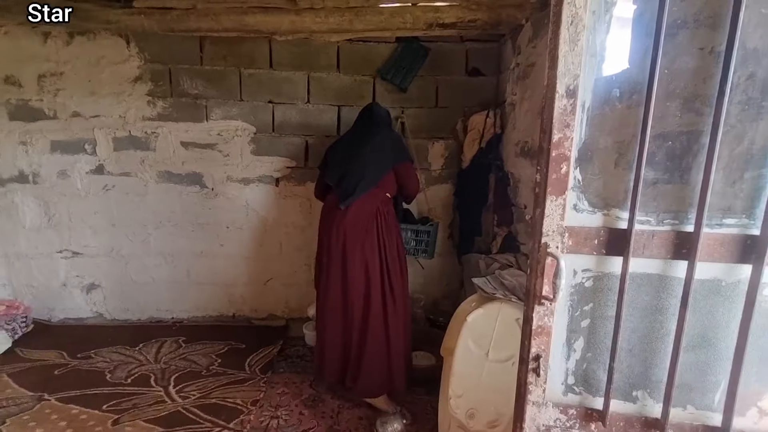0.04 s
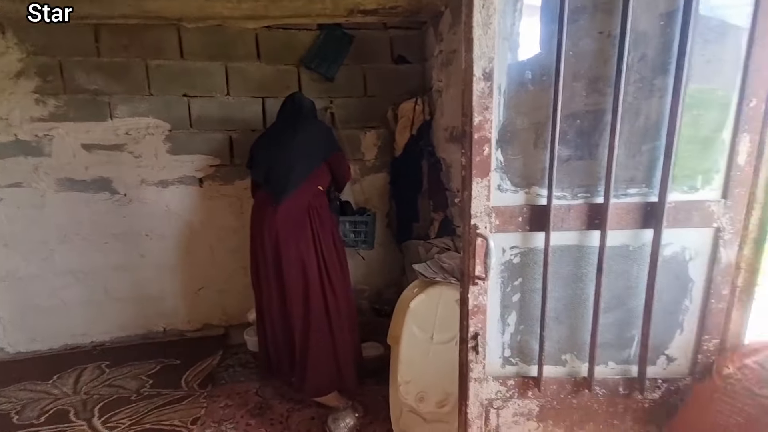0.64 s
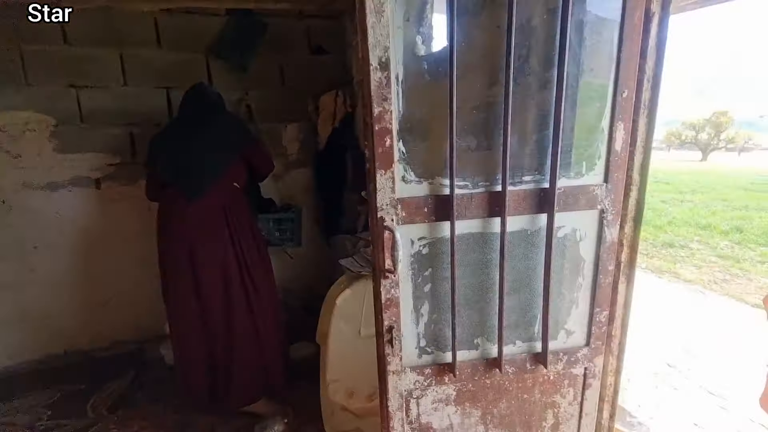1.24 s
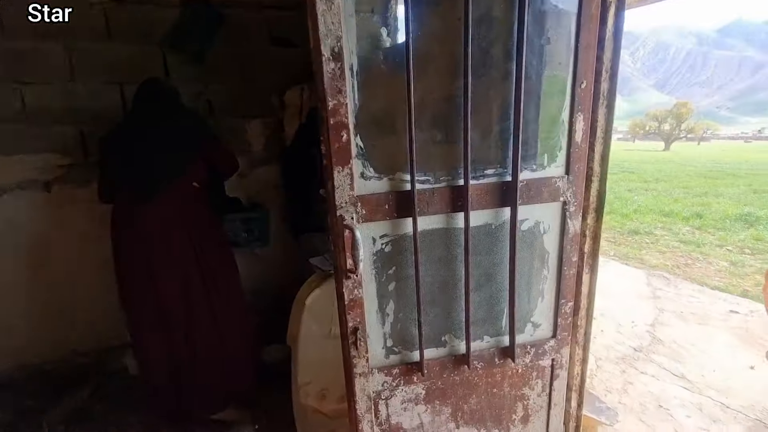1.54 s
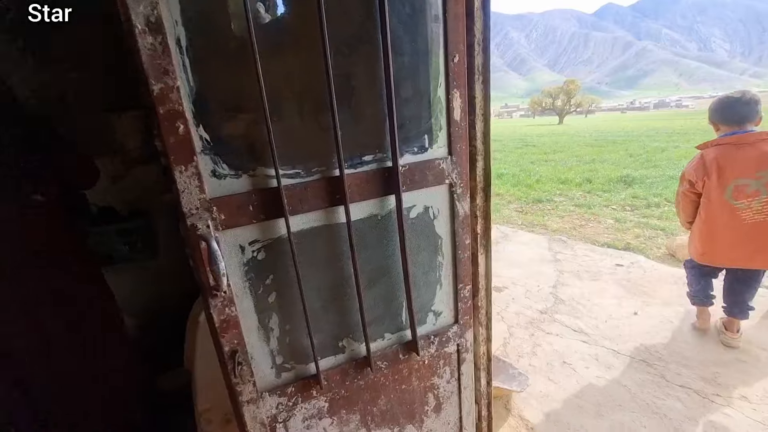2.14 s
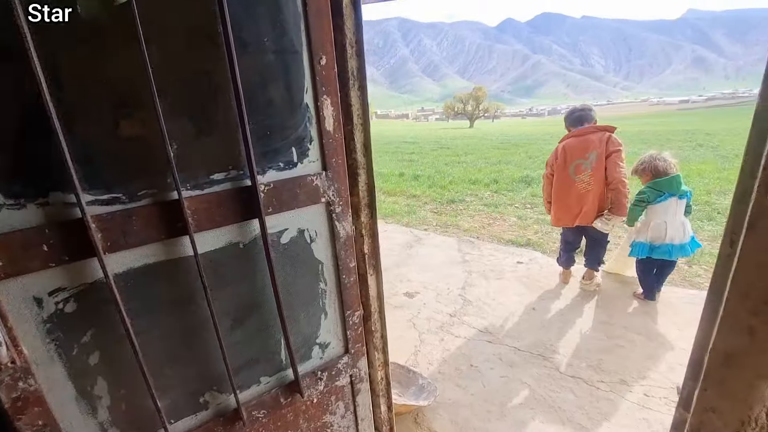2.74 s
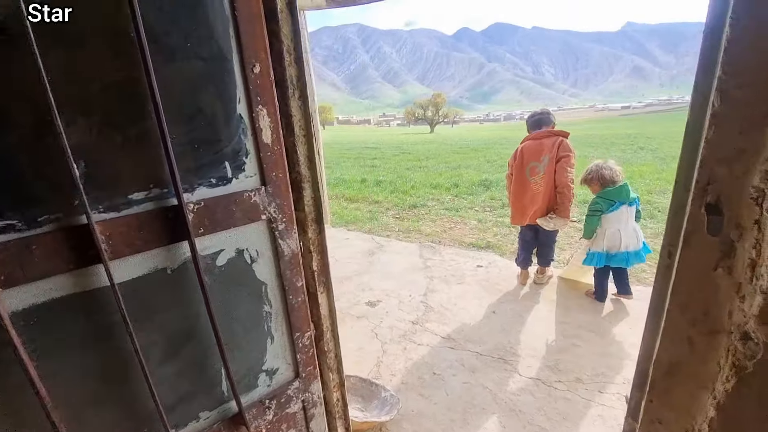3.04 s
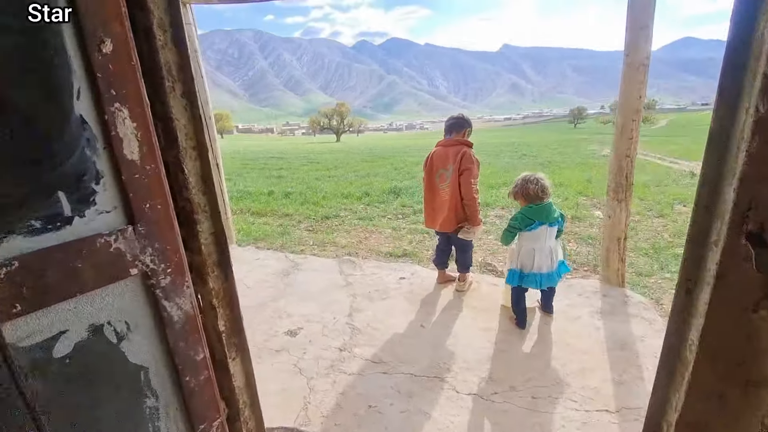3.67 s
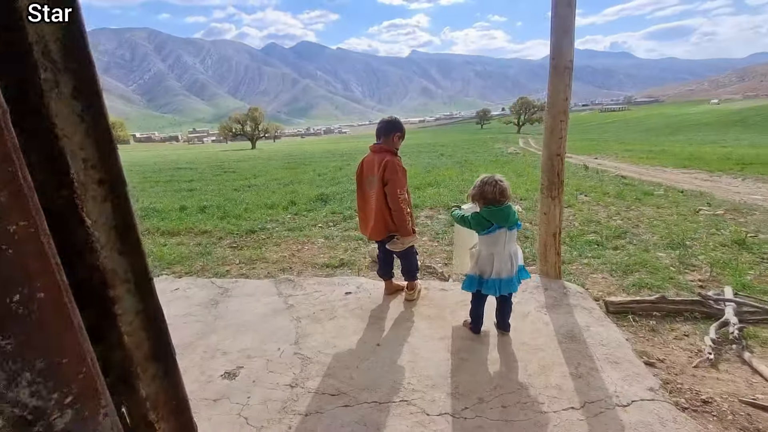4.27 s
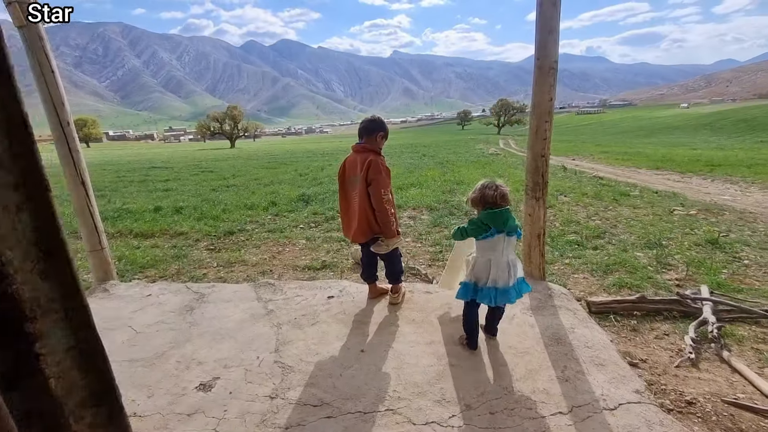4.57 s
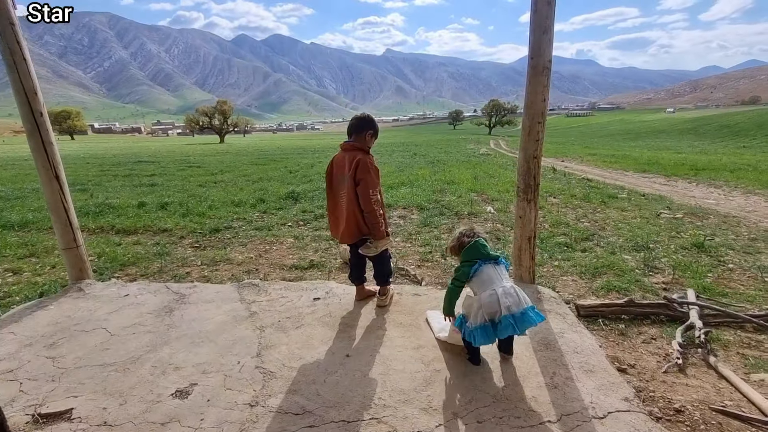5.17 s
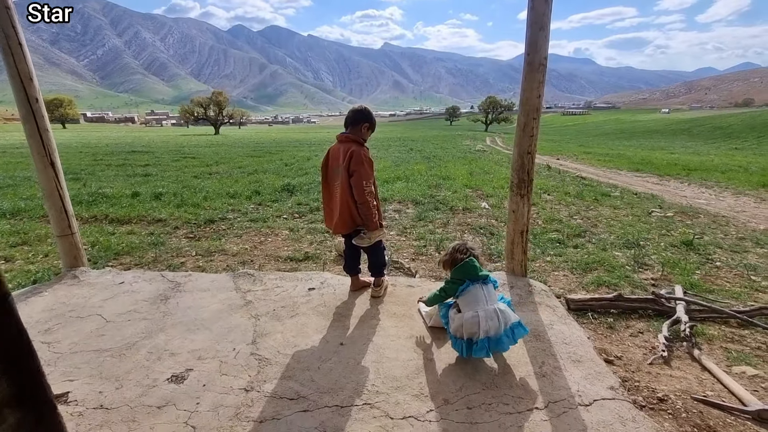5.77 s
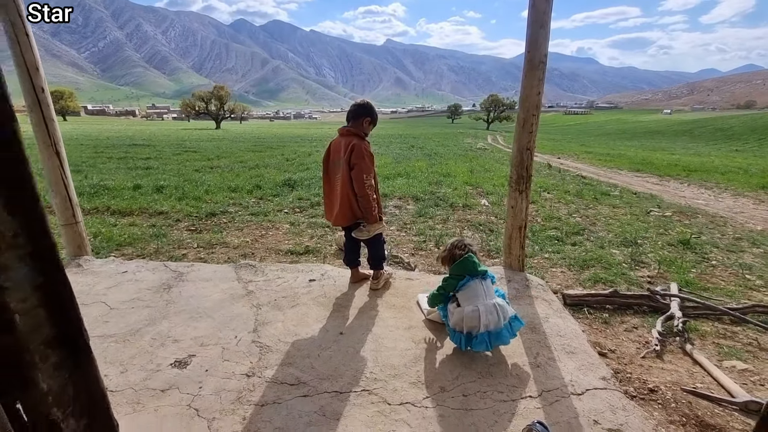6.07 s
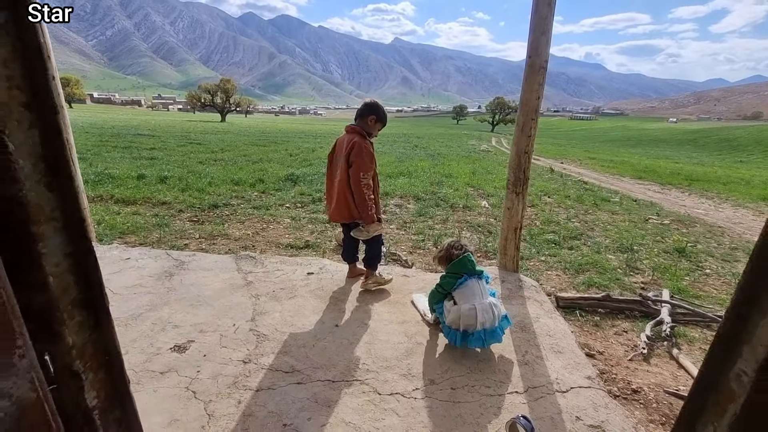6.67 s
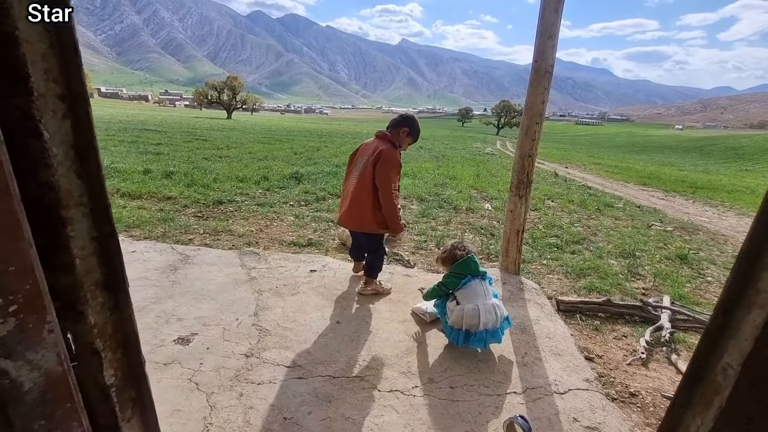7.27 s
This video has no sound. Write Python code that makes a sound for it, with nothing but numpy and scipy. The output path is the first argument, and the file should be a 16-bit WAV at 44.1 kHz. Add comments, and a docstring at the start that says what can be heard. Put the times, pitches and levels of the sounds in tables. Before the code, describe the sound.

A sharp clack of kitchenware opens, then come light hollow knocks and a dull thud on wood. For a few seconds there is only soft cloth rubbing and low rumble from the hand carrying the phone. A faint rising squeak leads into a quick cluster of ringing clinks from two glasses, with another thud beneath. The room is small with little echo, and the close sleeve rustle continues to the end.

```python
"""Kitchen clatter from a doorway

A hand-held phone is carried into a small, dead room, its two microphone ports hearing the grip
rumble and a sleeve rub right beside them. Out in the room, kitchen things are put down with a hard
clack, lighter knocks and wooden thuds, while dull bumps come through the phone's own case.
Near 5 s something squeaks faintly, then two glasses clink and chatter against each other."""
import sys
import numpy as np
from scipy import signal
from scipy.fft import rfft, irfft
from scipy.io import wavfile
from scipy.ndimage import uniform_filter1d, map_coordinates

SR = 44100
rng = np.random.default_rng(int(sys.argv[2]) if len(sys.argv) > 2 else 0)


def store_pcm(level_fs):
    """Save levels as 16-bit WAV."""
    pcm = np.round(np.clip(level_fs, -1, 1) * 32767).astype(np.int16)
    wavfile.write(sys.argv[1], SR, np.atleast_2d(pcm).T)


N = 331632
TIME = np.arange(N) / SR
AGE = TIME[:SR * 3 // 4]  # seconds since the start of a short sound
SIDES = np.array([[1], [-1]])  # left port, right port


def undb(db):
    """Decibels to gain."""
    return 10 ** (np.asarray(db) / 20)


def along(points, hz):
    """Read (f/Hz, value) points on a log-frequency axis."""
    at, value = np.transpose(points)
    return np.interp(np.log(np.maximum(hz, 1)), np.log(at), value)


def bins(size):
    """Frequencies of a spectrum of this many samples."""
    return np.maximum(np.fft.rfftfreq(size, 1 / SR), 1)


def unit(x):
    """Scale so that the mean of both channels has rms 1."""
    return x / np.std(x.mean(axis=0))


def add(out, s, sound):
    """Mix a sound in at time s."""
    start = int(s * SR)
    out[:, start:start + sound.shape[1]] += sound[:, :N - start]


def walk(rate):
    """Random levels held 1 / rate s and smoothed twice."""
    step = int(SR / rate)
    held = np.repeat(rng.standard_normal(N // step + 1), step)[:N]
    return uniform_filter1d(uniform_filter1d(held, step), step)


def movement(start, rise, hold, fade):
    """Power of one movement: it gathers speed smoothly, holds, then falls 20 dB per fade time."""
    age = TIME - start
    attack = np.sin(np.pi / 2 * np.clip(age / rise, 0, 1)) ** 2
    release = undb(-20 * np.maximum(age - rise - hold, 0) / fade)
    return (attack * release) ** 2


# how alike the phone's two ports hear the room: f/Hz, correlation
PORT_LIKENESS = [(60, 0.9), (150, 0.94), (650, 0.47), (1400, -0.33), (3000, 0.05), (15000, 0)]

def noise(colour, size, grain_db=0):
    """Spectrum of diffuse noise at the two ports; uneven grain sizes make it scratchy."""
    hz = bins(size)
    mid, side = rfft(rng.standard_normal((2, size)) * undb(grain_db * rng.uniform(-0.99, 1, size)))
    alike = along(PORT_LIKENESS, hz)
    return (mid * np.sqrt(1 + alike) + SIDES * side * np.sqrt(1 - alike)) * undb(along(colour, hz))


def dense_ring(colour, decay, tilt_db=0):
    """A blow and its early reflections: octave bands of noise, each dying at its own rate."""
    size = len(AGE)
    hz = bins(size)
    spectrum = noise(colour, size) * undb(tilt_db * np.log2(np.maximum(hz / 1000, 1)))
    centres = 2. ** np.arange(5, 15)
    bands = np.array([irfft(spectrum * np.maximum(1 - abs(np.log2(hz / c)), 0), size) for c in centres])
    fade = undb(-60 * AGE / along(decay, centres)[:, None])
    return (bands * fade[:, None]).sum(axis=0) / np.std(bands.sum(axis=0))


def ring(modes, tilt_db=0):
    """Decaying modes; the higher ones reach the two ports out of step."""
    out = 0
    for hz, db, t60 in modes:
        apart = np.arccos(along(PORT_LIKENESS, hz)) * rng.choice([-1, 1])
        phase = rng.uniform(0, 2 * np.pi) + SIDES * apart / 2
        fade = undb(db + tilt_db * np.log2(max(hz / 1000, 1)) - 60 * AGE / t60)
        out = out + fade * np.sin(2 * np.pi * hz * AGE + phase)
    return out


def blows(events, modes, colour, decay, modes_db):
    """An object is struck; softer contact dulls both its modes and its dense ring above 1 kHz."""
    out = np.zeros((2, N))
    for s, db, tilt_db, build, pan_db in events:
        sound = dense_ring(colour, decay, tilt_db) + undb(modes_db) * ring(modes, tilt_db)
        onset = 1 - np.exp(-AGE / build)
        add(out, s, sound * onset * undb(db + SIDES * pan_db / 2))
    return out


# spectrum of the handling noise: f/Hz, level/dB
GRIP_SPECTRUM = [(20, -25), (40, -3.5), (62, -1), (85, -5.5), (130, -15.5), (600, -41.5)]
# fingers shifting on the phone: t/s, hold/s, level/dB
GRIP_SHIFTS = [(0.364, 0.68, -64), (2.403, .1, -57), (3.62, 0.37, -61.5), (5.647, 0.16, -53),
               (6.385, 0.03, -57), (7.376, 0.089, -60)]
# dull bumps on the case itself: t/s, level/dB, f/Hz, t60/s
CASE_BUMPS = [(0.0993, -12, 215, 0.0046), (0.944, -35.5, 129, 0.09), (0.977, -38, 77, 0.16),
              (1.484, -46, 218, 0.11), (1.495, -38.5, 93.7, 0.14), (1.538, -33.5, 76, 0.12),
              (2.419, -41, 66.2, 0.37), (3.736, -46, 61, 0.28), (5.284, -35.5, 244, 0.29),
              (5.303, -38, 76, 0.31), (5.748, -49, 107, .15)]

def hand(grip_db=-59, settle_db_per_s=1.1, sway_db=4.0):
    """The grip rumbles through the case as it settles, swells when fingers shift, and bumps it."""
    power = undb(grip_db - settle_db_per_s * TIME) ** 2
    for start, hold, db in GRIP_SHIFTS:
        power += movement(start, rise=0.035, hold=hold, fade=0.4) * undb(db) ** 2
    rumble = unit(irfft(noise(GRIP_SPECTRUM, N), N))
    out = rumble * np.sqrt(power) * undb(sway_db * walk(8.8))
    for s, db, hz, t60 in CASE_BUMPS:
        fade = undb(db - 60 * AGE / t60)
        add(out, s, -(fade * np.sin(2 * np.pi * hz * AGE))[None])
    return out


# spectrum of cloth rubbing at the microphone: f/Hz, level/dB
CLOTH_SPECTRUM = [(90, -31.5), (160, -15), (310, -11.5), (440, -6.5), (1450, -5.5), (2350, -3.5),
                  (3100, -4.5), (4200, -3), (5800, -9.5), (7400, -9.5), (8900, -17.5), (12700, -11),
                  (16000, -16.5)]
# slides beside the ports: t/s, rise/s, hold/s, fade/s, hiss/dB, scrape re hiss/dB, air re hiss/dB
SLEEVE_SLIDES = [(0.054, .1, 0.56, 0.34, -65, 0.5, -14), (0.23, 0.036, .01, 0.11, -56.5, 2, -6.5),
                 (0.467, 0.22, 0.53, .3, -52.5, -6.5, -8.5), (0.868, 0.08, 0.071, 0.35, -46.5, -10, -6.5),
                 (1.03, .1, .025, 0.12, -48.5, -7.5, -14.5), (1.205, 0.066, 0.26, 0.32, -57, -10.5, -8),
                 (1.71, 0.078, 0.011, 0.14, -62.5, -22, -6), (1.852, 0.058, 0.33, 0.31, -61.5, -7.5, -9.5),
                 (2.06, 0.094, 0.0078, 0.14, -50, -18, -8), (2.183, 0.22, 0.27, 0.84, -49.5, -9, -10),
                 (2.833, 0.061, 0.021, 0.28, -53.5, -6, -10), (3.01, .14, 0.042, 0.28, -52, -7.5, -7.5),
                 (3.255, 0.09, 0.28, 1, -51.5, -7.5, -13.5), (4.4, 0.054, 0.0069, 0.038, -54, -12, -6.5),
                 (4.65, 0.086, .02, 0.57, -66.5, -3.5, -23), (4.826, .12, 0.05, 0.061, -62, -8.5, -12),
                 (5.5, 0.083, 0.1, 0.23, -59.5, 1, -15), (5.649, 0.057, .02, 0.19, -50, -5, -6.5),
                 (5.738, 0.092, 0.042, 0.44, -46, -11.5, -7.5),
                 (6.25, 0.065, 0.025, 0.19, -47, -6.5, -11.5),
                 (6.37, 0.075, 0.15, 0.42, -55.5, -7.5, -12.5), (6.996, 0.11, 0.062, 0.7, -54, -13, -12),
                 (7.28, 0.082, 0.032, 0.31, -55.5, -10.5, -13)]

def sleeve(scrape_hz=1900, air_hz=8200, flutter_db=1.51, sway_db=0.1):
    """Countless fibres slip right beside the ports: a low scrape, a hiss and an airy top."""
    hiss, scrape, air = undb([-73.5, -79, -81]) ** 2  # the cloth never rests entirely
    for start, rise, hold, fade, db, scrape_db, air_db in SLEEVE_SLIDES:
        power = movement(start, rise, hold, fade) * undb(db) ** 2
        hiss = hiss + power
        scrape = scrape + power * undb(scrape_db) ** 2
        air = air + power * undb(air_db) ** 2
    hz = bins(N)
    fibres = noise(CLOTH_SPECTRUM, N, grain_db=7.5)
    low = 1 / (1 + (hz / scrape_hz) ** 4)
    high = 1 - 1 / (1 + (hz / air_hz) ** 10)
    layers = [(low, scrape), (1 - low - high, hiss), (high, air)]
    rubbing = sum(unit(irfft(fibres * band, N)) * np.sqrt(power) for band, power in layers)
    return rubbing * undb(flutter_db * walk(90) + sway_db * walk(25))  # the cloth catches and lets go


# hard contacts in the room: t/s, level/dB, treble tilt/(dB/octave), build-up/s, left minus right/dB
CLACK_HITS = [(0.0338, -15, -1, 0.0005, 1.5), (0.0378, -17, -3, 0.0011, -2.5),
              (0.0455, -21.5, 0, 0.0015, 4), (0.064, -29, -6, .003, -0.5)]
# modes of the hard object: f/Hz, level/dB, t60/s
CLACK_MODES = [(835, -7, .16), (912, -3, .18), (983, -2, .18), (1186, -7, .18), (1295, -5, .24),
               (1415, -2, .17), (1772, 4, .15), (2010, -4, .17), (2907, -3, .19), (3050, -4, .17),
               (3290, -3, .13), (3623, 1, .13), (4124, -6, .14)]
# spectrum of its dense ring: f/Hz, level/dB
CLACK_SPECTRUM = [(100, -26.5), (420, -15.5), (850, -2), (1800, -1), (2500, -4.5), (3400, -6.5), (4500, -6),
                  (5600, -8), (7600, -11), (9000, -21), (15000, -35.5)]
# decay of its dense ring: f/Hz, t60/s
CLACK_T60 = [(200, 0.32), (1000, 0.15), (3000, 0.2), (8000, 0.071), (15000, 0.25)]

def clack():
    """A hard kitchen thing is put down: four contacts in quick succession set it ringing."""
    return blows(CLACK_HITS, CLACK_MODES, CLACK_SPECTRUM, CLACK_T60, modes_db=-6)


# sleeve folds catching on the phone: t/s, length/s, level/dB, centre/Hz, width/Hz
FOLD_STROKES = [(0.165, 0.078, -52, 5640, 8000), (1.271, 0.026, -47.5, 4090, 1478),
                (1.341, 0.08, -51, 3860, 1006), (1.882, 0.045, -55, 6600, 12200),
                (2.369, .6, -55.5, 2380, 700), (3.424, 0.45, -53, 2550, 700),
                (5.067, 0.069, -60, 4780, 2500), (5.671, 0.12, -42.5, 3960, 497),
                (5.86, 0.48, -59, 4100, 600), (6.288, 0.11, -51, 2850, 1448),
                (6.913, .058, -61.5, 4100, 800), (7.217, 0.09, -54, 3400, 1500)]

def folds(rasp_db=3):
    """A fold drags over the case: uneven slips ring one resonance, swelling quickly and fading."""
    out, size = np.zeros((2, N)), len(AGE)
    hz = bins(size)
    for s, length, db, centre, width in FOLD_STROKES:
        resonance = 1 / (1 + 1j * (hz / centre - centre / hz) * centre / width)
        rasp = unit(irfft(noise(CLOTH_SPECTRUM, size) * resonance, size))
        swell = np.interp(AGE / length, [0, 1 / 5, 1 / 2, 1], [0, 1, 3 / 4, 0])
        add(out, s, undb(db) * swell * rasp)
    return out * undb(rasp_db * walk(120))


# light knocks in the room: t/s, level/dB, treble tilt/(dB/octave), build-up/s, left minus right/dB
HOLLOW_HITS = [(0.173, -46, -20, 0.00063, 1), (0.641, -35, 0.5, 0.00094, -0.5), (.652, -47.5, 6, 0.0012, 2),
               (0.667, -45, 10, 0.001, -2), (0.773, -38, 7.5, 0.0035, -3), (1.0225, -35.5, 2, 0.0009, -0.5)]
# modes of the knocked object: f/Hz, level/dB, t60/s
HOLLOW_MODES = [(904, 11.5, 0.029), (774, -1.5, 0.081), (862, -1, 0.16), (1216, 0, 0.076),
                (1743, -3.5, 0.1)]
# spectrum of its dense ring: f/Hz, level/dB
HOLLOW_SPECTRUM = [(100, -42), (260, -3.5), (550, -10.5), (800, -2), (1400, -2.5), (1750, -5), (2600, -15),
                   (12000, -59)]
# decay of its dense ring: f/Hz, t60/s
HOLLOW_T60 = [(300, 0.31), (3000, 0.11)]

def hollow_knocks():
    """Things set down more lightly answer with a short, hollow midrange ring."""
    return blows(HOLLOW_HITS, HOLLOW_MODES, HOLLOW_SPECTRUM, HOLLOW_T60, modes_db=0.5)


# thuds in the room: t/s, level/dB, treble tilt/(dB/octave), build-up/s, left minus right/dB
WOOD_HITS = [(1.9522, -31, -1, 0.00029, 0.5), (1.958, -36.5, -9, 0.00099, -3),
             (0.931, -42, -17, 0.0031, -2), (5.286, -34.5, -5, 0.0075, -1.5),
             (5.314, -37.5, -16, 0.014, -1), (5.5755, -53, 1, 0.0006, -6)]
# modes of the wood: f/Hz, level/dB, t60/s
WOOD_MODES = [(268, 2, 0.14), (325, 3, 0.12), (436, 1, .12), (485, 3, 0.12), (665, -4, 0.11),
              (855, -4, 0.12)]
# spectrum of its dense ring: f/Hz, level/dB
WOOD_SPECTRUM = [(50, 3.5), (140, -5.5), (380, -6), (750, -8.5), (1250, -14), (2000, -7.5), (3100, -6),
                 (4800, -18.5), (12000, -36)]
# decay of its dense ring: f/Hz, t60/s
WOOD_T60 = [(100, 0.12), (500, 0.2), (3000, 0.11), (12000, 0.083)]

def wooden_thuds():
    """Struck wood sounds its low, quickly damped modes."""
    return blows(WOOD_HITS, WOOD_MODES, WOOD_SPECTRUM, WOOD_T60, modes_db=-4)


# course of a squeak, faint at the microphone: t/s, f/Hz, level/dB
SQUEAK_GLIDE = [(4.932, 520, -66), (4.965, 883, -58), (4.99, 940, -54), (5.015, 1020, -68)]

def squeak(roughness=0.053, overtone_db=-13, flutter_db=3):
    """A short, unsteady tone glides upward."""
    s, hz, db = np.transpose(SQUEAK_GLIDE)
    pitch = np.interp(TIME, s, hz) * (1 + roughness * walk(600))
    phase = 2 * np.pi * np.cumsum(pitch) / SR + SIDES / 2
    loudness = np.interp(TIME, s, undb(db), left=0, right=0) * undb(flutter_db * walk(200))
    return (np.sin(phase) + undb(overtone_db) * np.sin(2 * phase)) * loudness


# modes of each glass: f/Hz, level/dB, t60/s
FIRST_GLASS = [(2940, -3.5, 0.31), (3100, -5, 0.25), (5238, -12.5, 0.21), (6950, -13, 0.2),
               (7270, -3, 0.13), (7960, -11, .14), (10200, -24, 0.13), (13750, -25, .2)]
SECOND_GLASS = [(2920, -1, 0.23), (2960, -3.5, 0.27), (3056, -2.5, 0.26), (5120, -18.5, 0.34),
                (5150, -19, 0.5), (6100, -19.5, 0.028), (7060, -13.5, 0.24), (7205, -10, 0.2),
                (7800, -13.5, 0.2), (10166, -33, 0.24), (10800, -32, 0.3), (13404, -22, 0.18),
                (13950, -30, .17)]
# glass meeting glass in the room: t/s, first glass/dB, second glass/dB, snap/dB
GLASS_CONTACTS = [(5.222, -45, -63, -39.5), (5.231, -30, -60, -38.5), (5.246, -25, -63, -34),
                  (5.315, -37, -28.5, -29), (5.3205, -48, -24.5, -24), (5.3244, -37, -15.5, -32),
                  (5.427, -38, -35, -35.5), (5.487, -46, -33, -45), (5.516, -45, -34.5, -45)]
# spectrum of the clink's snap, with a deep notch near 8.8 kHz from audio coding: f/Hz, level/dB
NOTCHED_SNAP_SPECTRUM = [(250, -8.5), (950, -11.5), (1700, -5.5), (2400, -11), (3030, 6), (3350, 0.5),
                         (4400, -2.5), (6300, -25), (7200, -9), (8050, -9), (8800, -54), (13900, -23),
                         (14800, -52)]
# decay of the snap: f/Hz, t60/s
SNAP_T60 = [(300, 0.26), (3000, 0.12), (12000, 0.18)]
# the rims sliding on each other: t/s, rise/s, hold/s, fade/s
RIM_SLIDE = (5.218, .01, .29, .14)

def glasses(wall_t60=0.28, wall_gain=0.4, ring_db=-1, graze_db=-47, shiver_s=2.2e-5):
    """Each contact snaps and rings both glasses; the rims graze, and the near walls return the ring."""
    rings, snaps = np.zeros((2, 2, N))
    onset = 1 - np.exp(-AGE / .0012)
    for s, first_db, second_db, snap_db in GLASS_CONTACTS:
        both = undb(first_db) * ring(FIRST_GLASS) + undb(second_db) * ring(SECOND_GLASS)
        add(rings, s, onset * both)
        add(snaps, s, onset * undb(snap_db) * dense_ring(NOTCHED_SNAP_SPECTRUM, SNAP_T60))
    friction = unit(irfft(noise(NOTCHED_SNAP_SPECTRUM, N), N))
    graze = undb(graze_db) * np.sqrt(movement(*RIM_SLIDE)) * friction
    # the touching rims disturb the ring: low partials stay clear, high ones jangle
    rings = np.array([map_coordinates(side, [(TIME + shiver_s * walk(450)) * SR]) for side in rings])
    walls = rng.standard_normal((2, len(AGE))) * undb(-60 * AGE / wall_t60)
    walls *= wall_gain / np.linalg.norm(walls, axis=1, keepdims=True)
    reflections = signal.fftconvolve(rings, walls, axes=1)[:, :N]
    return snaps + graze + undb(ring_db) * (rings + reflections)


def scene():
    """The room's sounds and the handling noise, as they reach the two ports."""
    kitchen = clack() + hollow_knocks() + wooden_thuds() + glasses()
    handling = sleeve() + folds() + hand()
    return kitchen + handling + squeak()


# imbalance of the phone's microphone ports: f/Hz, left minus right/dB
PORT_BALANCE = [(60, 3), (700, 4), (1400, 2), (2400, -5), (3050, -6), (4300, -11), (5200, -5), (6200, 2),
                (7400, 5), (10000, -7.5), (15000, 0.5)]

def record(dry, bass_hz=40, top_hz=15800):
    """The phone: each port has its own colour; deep bass and top are cut, the highest peaks rounded."""
    low_cut = signal.butter(2, bass_hz, "high", fs=SR, output="sos")
    high_cut = signal.ellip(10, .2, 70, top_hz, fs=SR, output="sos")
    coloured = irfft(rfft(dry) * undb(SIDES * along(PORT_BALANCE, bins(N)) / 2), N)
    rounded = np.tanh(signal.sosfilt(low_cut, coloured))
    return signal.sosfilt(high_cut, rounded)


dry = scene()
out = record(dry)
store_pcm(out)
```